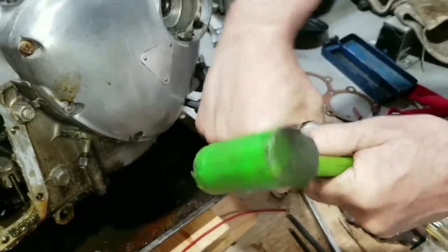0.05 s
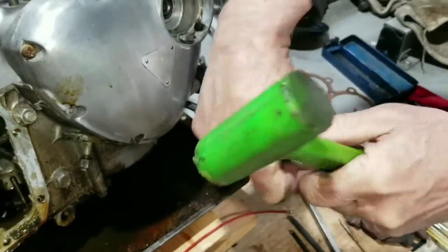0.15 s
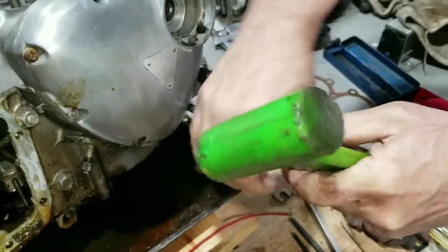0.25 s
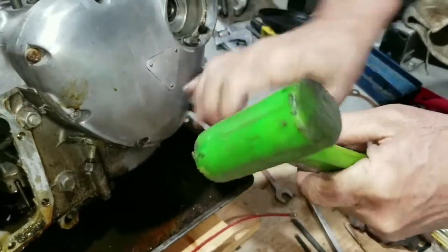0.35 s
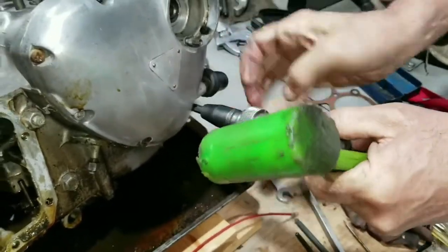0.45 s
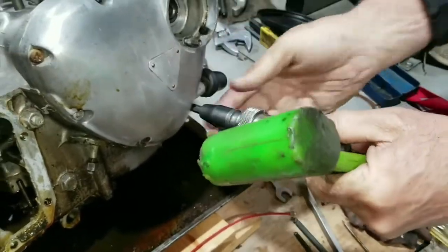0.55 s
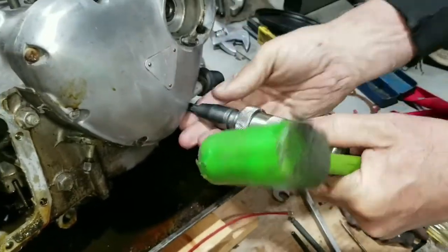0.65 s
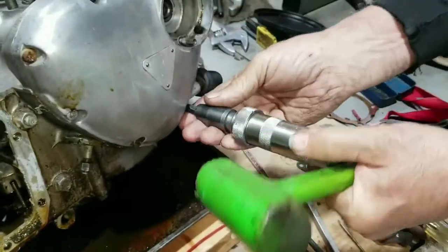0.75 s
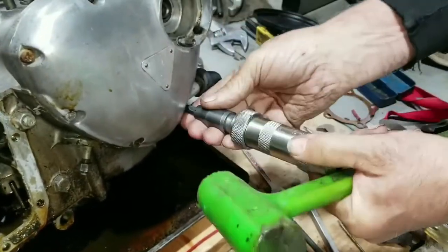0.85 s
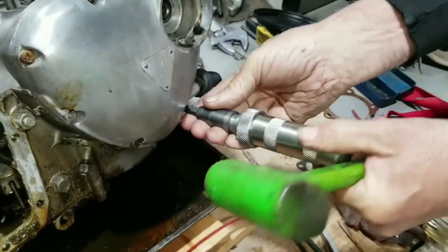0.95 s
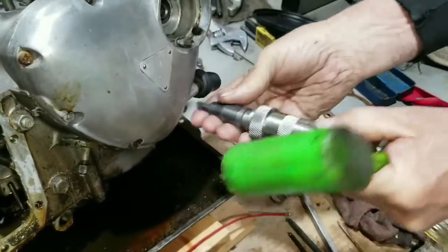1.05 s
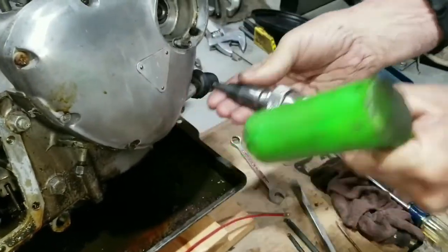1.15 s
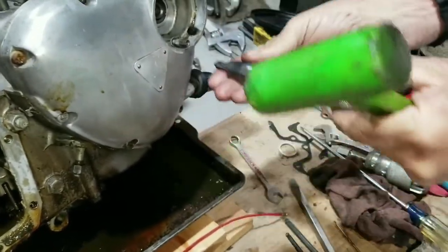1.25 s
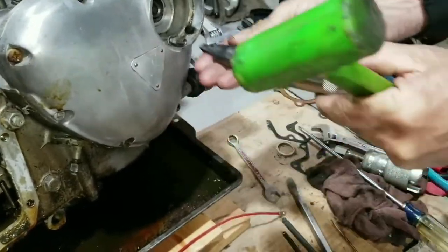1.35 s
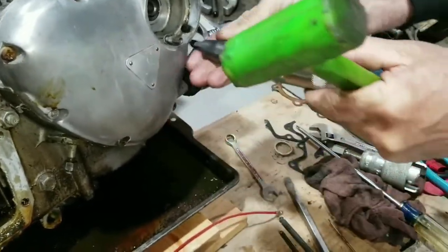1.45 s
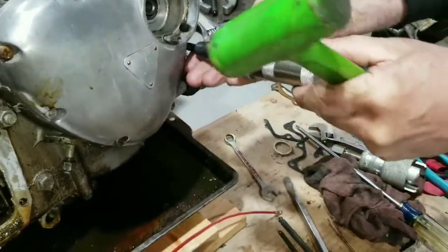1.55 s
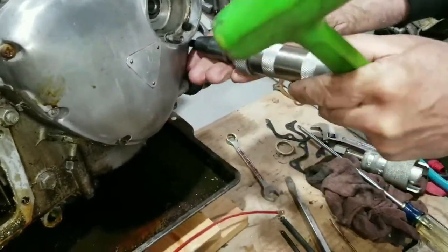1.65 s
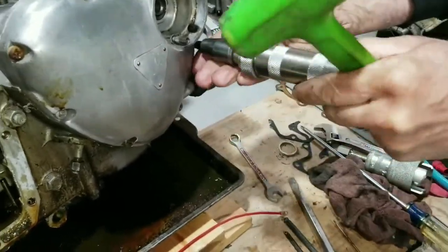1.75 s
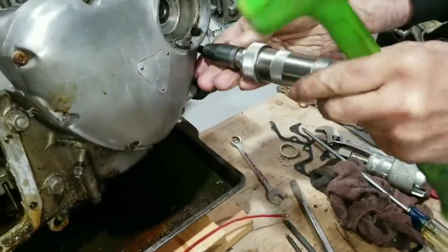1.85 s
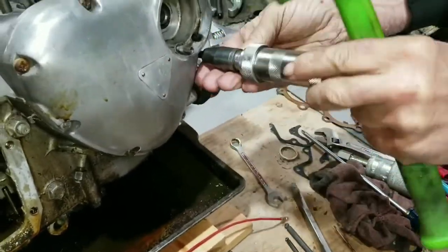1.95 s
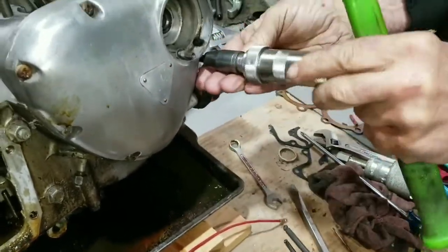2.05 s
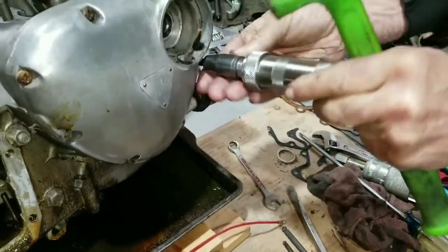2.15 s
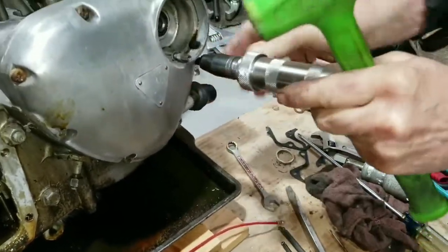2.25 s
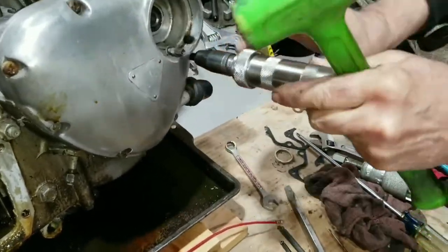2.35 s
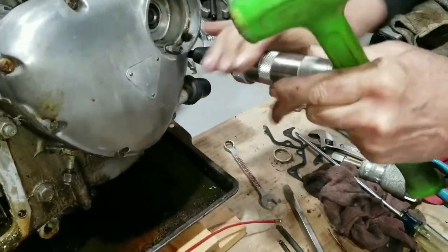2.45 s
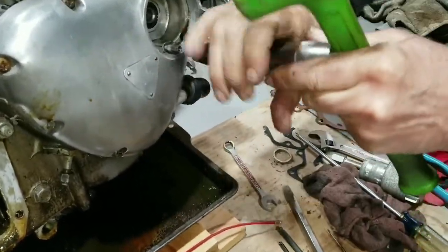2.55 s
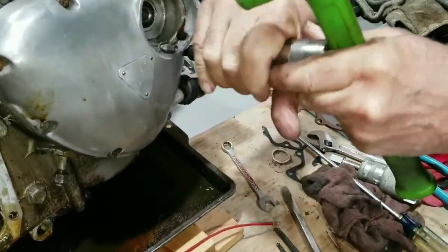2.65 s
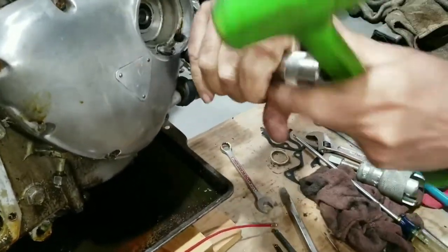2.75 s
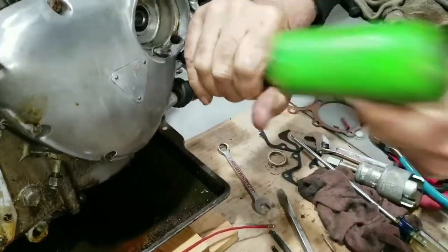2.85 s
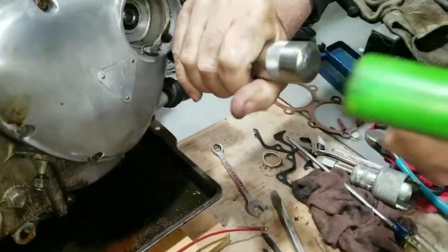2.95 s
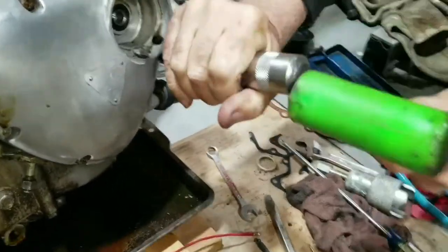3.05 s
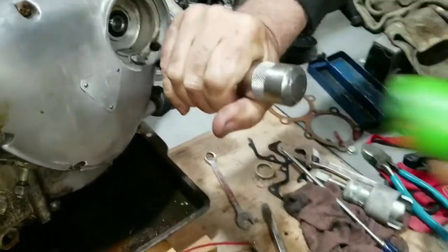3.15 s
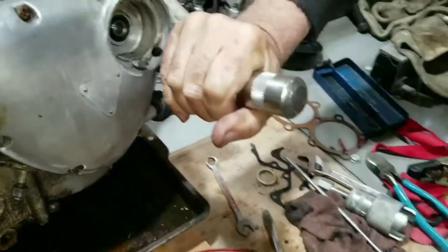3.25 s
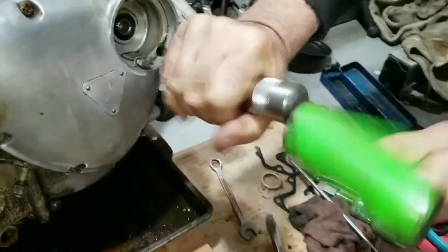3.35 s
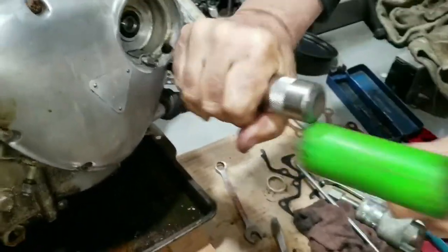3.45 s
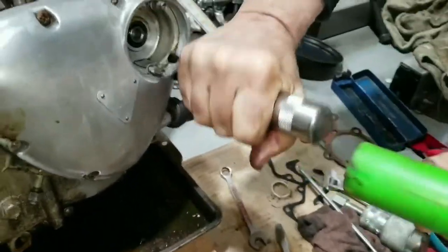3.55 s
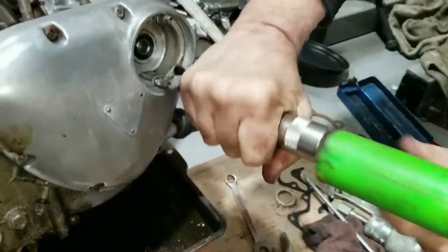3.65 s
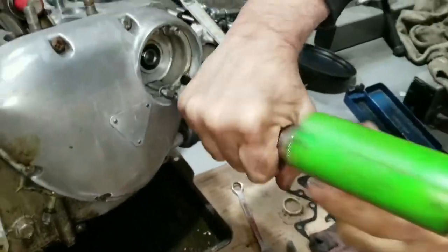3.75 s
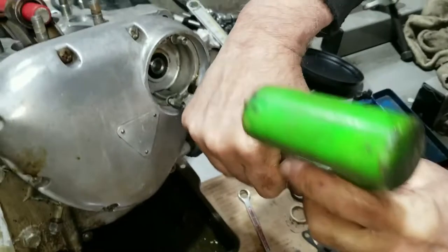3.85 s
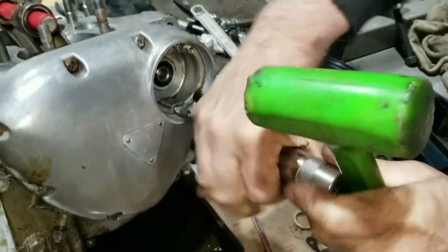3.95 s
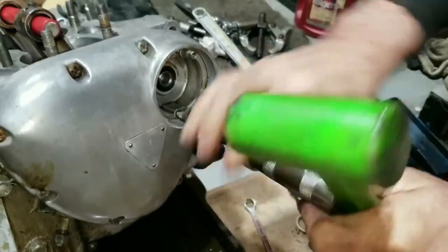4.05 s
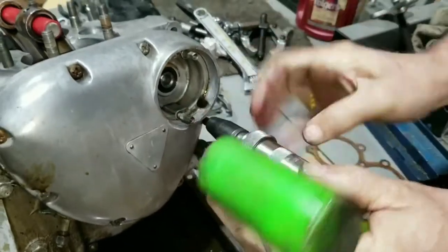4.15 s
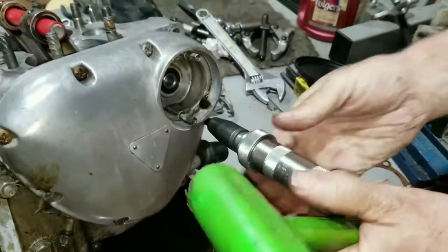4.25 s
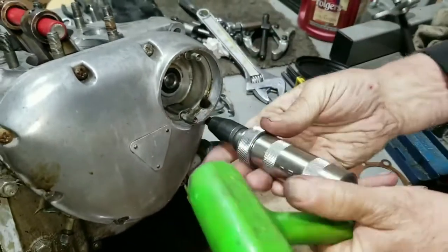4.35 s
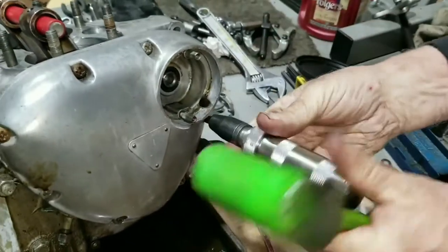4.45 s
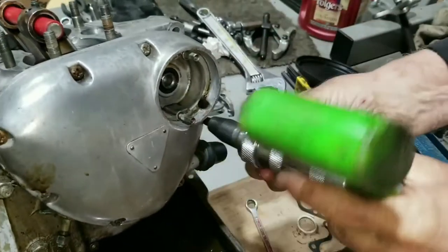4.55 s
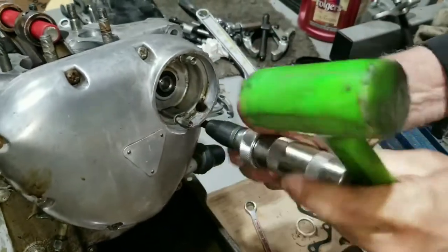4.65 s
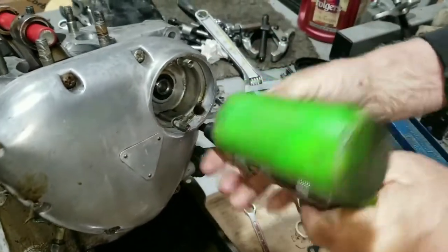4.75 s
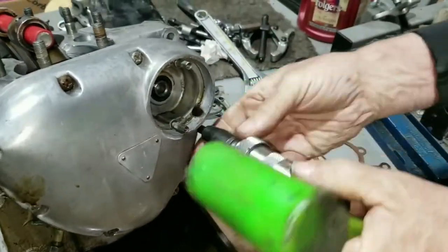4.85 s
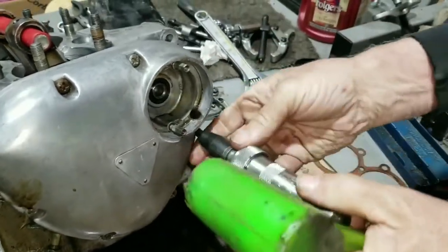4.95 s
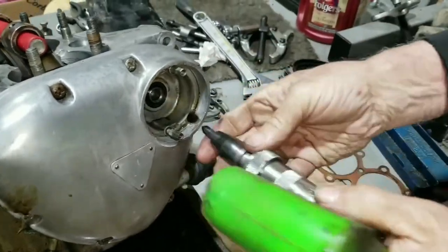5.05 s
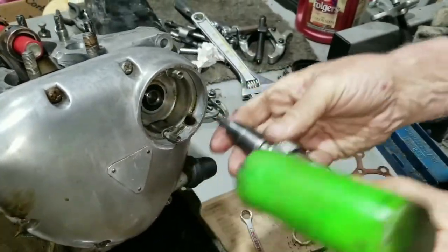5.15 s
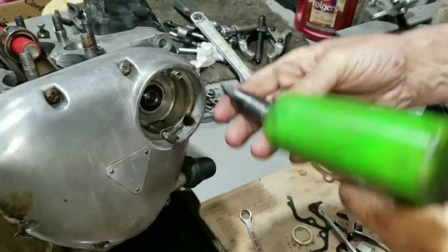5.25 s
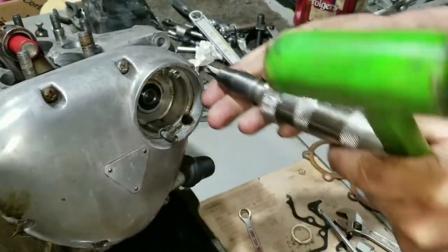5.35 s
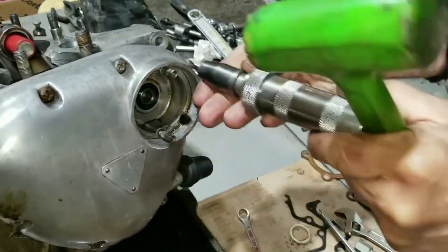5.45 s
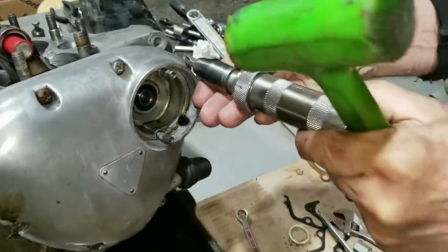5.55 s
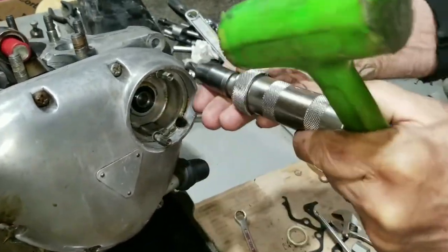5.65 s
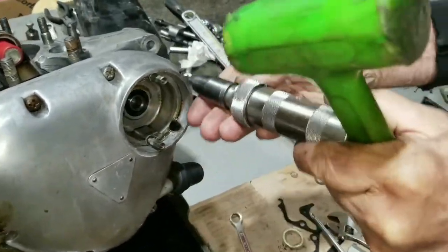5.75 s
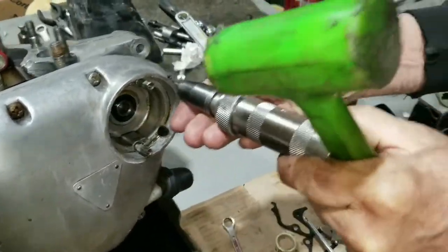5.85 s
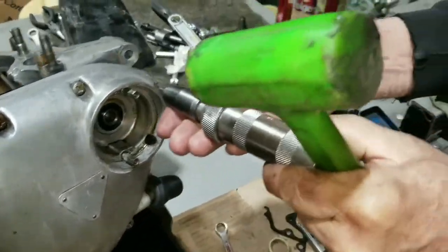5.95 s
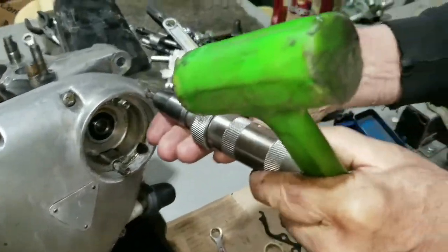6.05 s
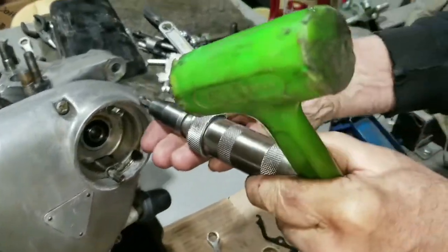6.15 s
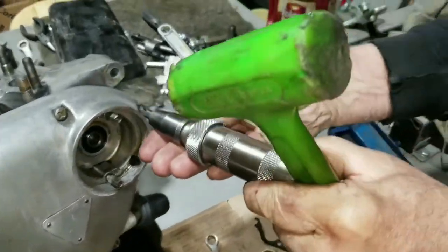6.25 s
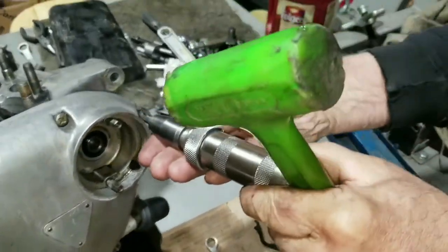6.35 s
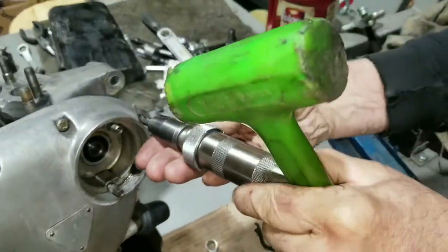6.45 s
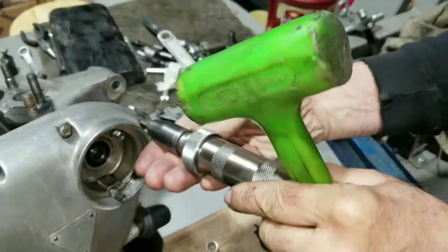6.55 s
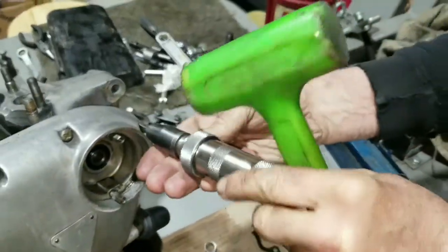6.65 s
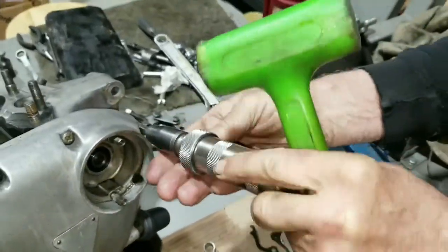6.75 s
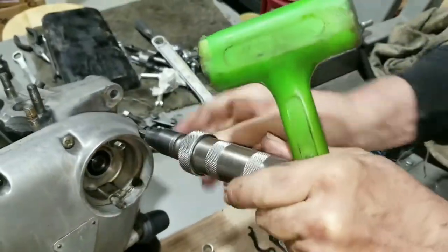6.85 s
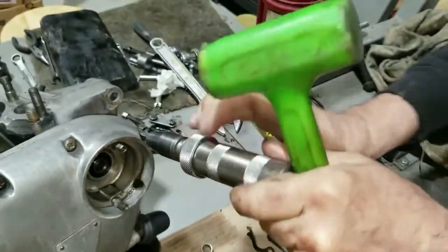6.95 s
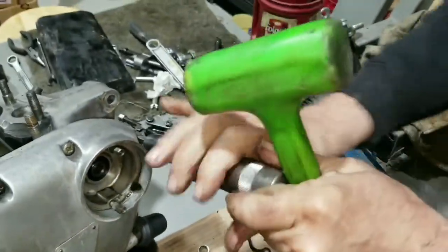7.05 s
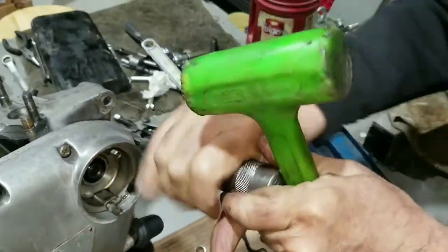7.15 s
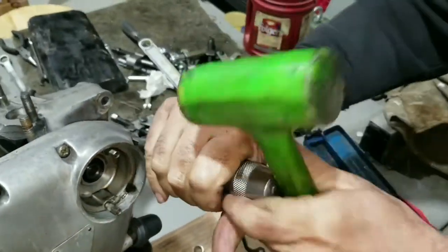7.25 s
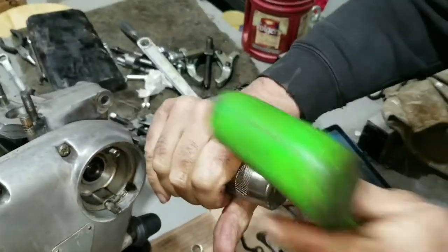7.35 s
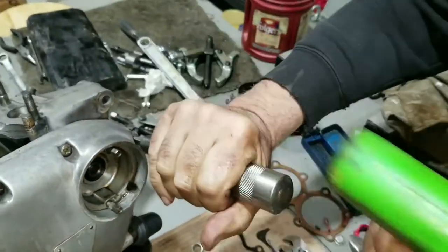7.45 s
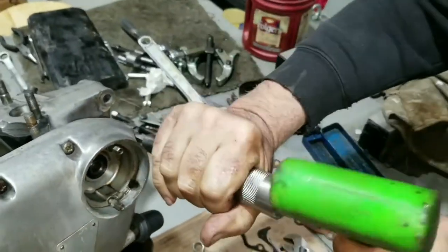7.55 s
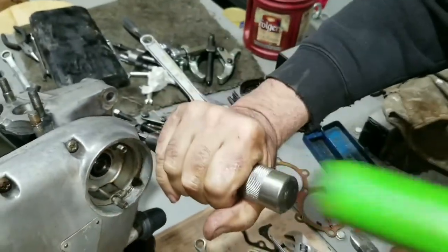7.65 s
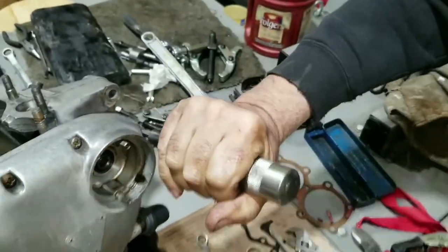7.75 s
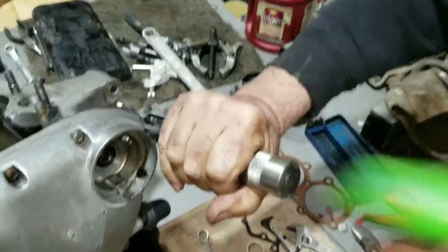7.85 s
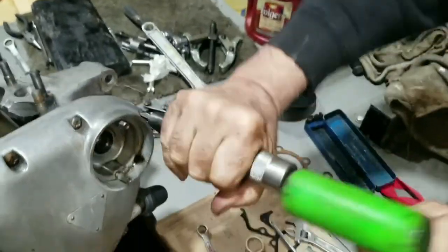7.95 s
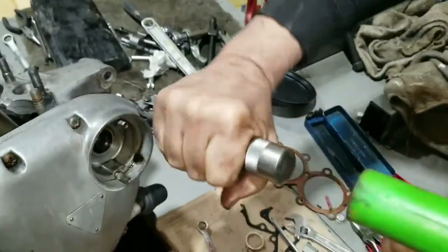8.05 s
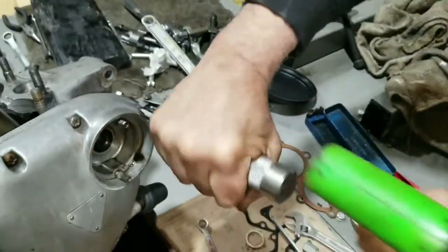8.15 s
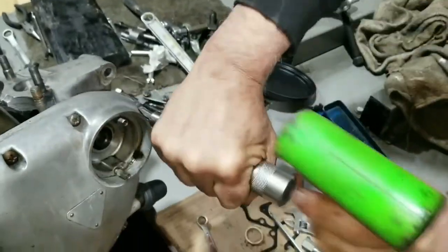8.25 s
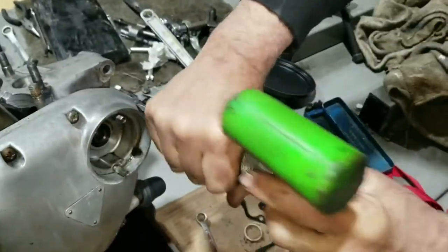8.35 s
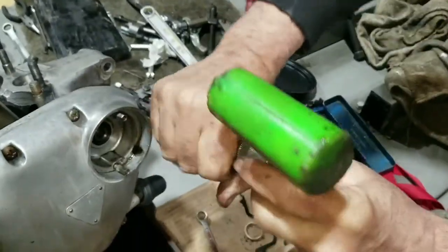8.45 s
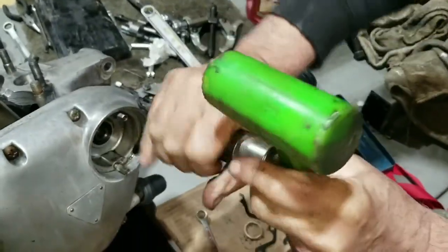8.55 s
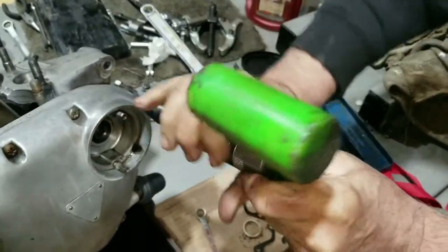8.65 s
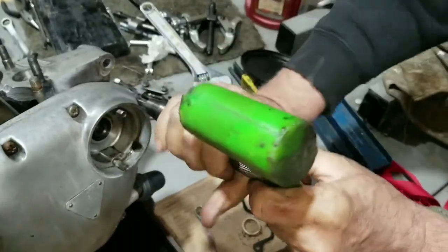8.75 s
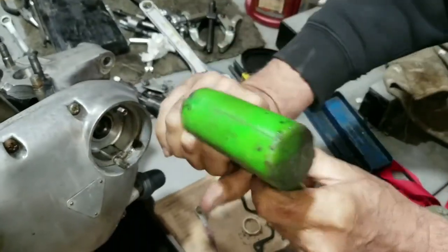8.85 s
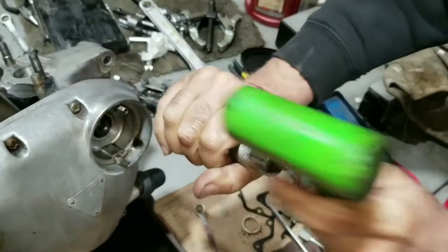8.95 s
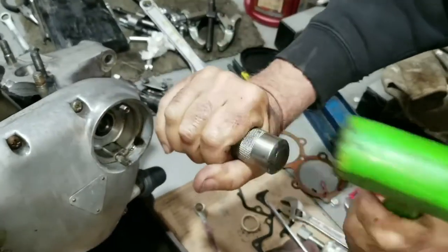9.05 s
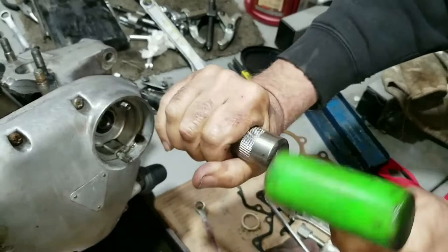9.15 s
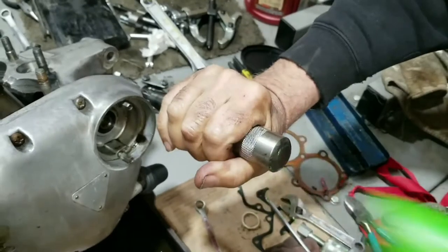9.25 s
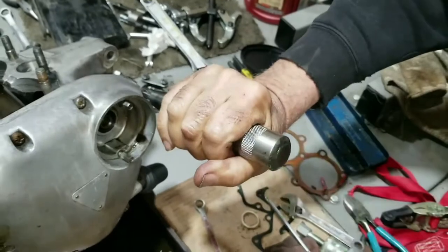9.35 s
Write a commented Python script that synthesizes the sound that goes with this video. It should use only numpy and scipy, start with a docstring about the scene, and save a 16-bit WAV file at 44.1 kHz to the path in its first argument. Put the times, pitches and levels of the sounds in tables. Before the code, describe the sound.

Small tool clicks and light taps surround two sharp, rattling mallet blows on an impact driver in a quiet garage.

```python
"""An impact driver on the screws of an engine's alloy cover, struck with a plastic mallet in a garage.
The bit clicks into a screw head, the mallet handle slides through a palm; a tap, a hard blow (3.3 s):
steel rattles, the cover clangs, the bench thuds, the room answers. The driver is turned and reseated;
another tap, the hardest blow (7.9 s), a last tap (9.1 s).
After each hard blow the gain control holds the faint rumble down for a second."""
import sys
import numpy as np
from scipy import signal
from scipy.fft import rfft, irfft
from scipy.io import wavfile
from scipy.ndimage import uniform_filter1d, minimum_filter1d

SR = 44100
rng = np.random.default_rng(int(sys.argv[2]) if len(sys.argv) > 2 else 0)


def file_out(sig):
    """Save sig as 16-bit WAV at sys.argv[1]."""
    # one column per channel
    cols = np.atleast_2d(sig).T
    # limit, then scale
    lim = np.clip(cols, -1, 1)
    pcm = np.round(lim * 32767).astype(np.int16)
    wavfile.write(sys.argv[1], SR, pcm)


N = 414981
TIME_S = np.arange(N) / SR
AGE_S = np.arange(SR * 2 // 3) / SR  # time since a hit

# mallet blows: t/s, level/dB, tilt/(dB/oct), thud/dB, rebound re blow/dB, rattle t60/s
MALLET_BLOWS = [(2.9961, -30, -0.5, -40, -24, 0.017), (3.3488, -10.5, 0, -23.5, 2.5, 0.1),
                (7.539, -24.5, 2.5, -27, -13, .022), (7.8774, 1, -3, -16.5, 1, 0.17),
                (9.1239, -26.5, 1.5, -35, -31, 0.029)]
# driver kicking back after a blow: delay/s, level/dB, rattle t60 factor
KICKBACKS = [(0.0144, 0, 1.5), (.048, -5, .3)]
# driver bumping the cover: t/s, steel/dB, clang/dB, bench and crankcase/dB, rattle t60/s
DRIVER_BUMPS = [(1.54, -58, -57.5, -46, 0.056), (1.749, -87, -54, -47, 0.093),
                (1.868, -71, -79, -54.5, .25), (1.931, -78, -64, -54, 0.066),
                (2.346, -46.5, -50, -51, 0.11), (2.447, -51.5, -63, -61.5, 0.055),
                (4.012, -57, -59, -53.5, 0.026), (4.652, -60, -68, -59.5, 0.33),
                (5.832, -46, -46, -51, 0.013), (5.871, -49.5, -64, -58, 1), (6.180, -53, -58, -67, 0.24),
                (6.483, -46.5, -47.5, -72, 0.031), (6.624, -61, -56, -53, 0.17),
                (6.824, -42.5, -52, -55, 0.012), (8.624, -45.5, -48, -49.5, 0.11)]
# bit dropping into a screw head: t/s, level/dB, f/Hz
BIT_CLICKS = [(0.9623, -42, 4120), (1.413, -46.5, 4800), (1.628, -55.5, 4900), (1.652, -56.5, 7000),
              (1.7469, -56.5, 5800), (2.0716, -52, 4160), (4.9246, -59.5, 3940), (5.01, -56, 4900),
              (5.027, -47.5, 10800), (5.4382, -50.5, 5330), (5.4525, -49.5, 3800), (5.566, -57, 5200),
              (5.7631, -48, 5800), (5.7779, -46, 6700), (5.978, -48, 5000), (6.0293, -51, 5700),
              (6.4482, -57.5, 5940), (6.4791, -43, 5340), (6.8226, -44.5, 6200), (8.1613, -27, 4200)]
# hand strokes: centre t/s, length/s, level/dB
HANDLE_SLIDES = [(2.708, .08, -52.5), (2.905, 0.13, -33)]
GRIP_SHIFTS = [(.15, 0.58, -79), (1.65, 0.89, -73), (3.315, 0.15, -54), (5.88, 0.63, -66),
               (6.88, .25, -60.5), (7.31, 0.0995, -68.5), (7.83, 0.15, -61), (9.41, 0.07, -65.5)]

# modes: f/Hz, level/dB, left-right/dB
DRIVER_MODES = [(2764, -1, -1.5), (2990, 0, 3.5), (3080, 0.5, -3.5), (3980, -5.5, 1), (4700, -7, 3)]
COVER_MODES = [(940, -9.5, 10), (1194, -6.5, 3.5), (1165, -4, -6), (1173, 0.5, -5), (1466, -2, 3),
               (1523, -3, -5.5), (1770, -6, 2), (2950, -9.5, -4.5), (3040, -17, 1), (3137, -8, -6),
               (4080, -11.5, -2.5)]
CASE_MODES = [(226, -5.5, 0.5), (352, -12, 1), (504, -3, 3.5), (516.6, 3.5, 5.5), (620, -10, 4),
              (734.6, -11.5, -3)]  # hollow crankcase
CASE_LONG_MODES = [(506, 0, 2), (523, -2, 4), (1195, -7, -2), (1395, -7, 0), (2929, -12, 0)]
BENCH_MODES = [(71, -10.5, 3.5), (84.6, -3.5, -1), (120, -0.5, 2.5), (159, -8.5, 3), (215.3, -2.5, 1.5)]

# spectra: f/Hz, level/dB
STEEL_SPECTRUM = [(50, -47.5), (300, -22), (900, -6), (2100, -5.5), (3100, 0.5), (5000, -0.5), (7000, -2),
                  (9000, -4), (11500, -7), (14500, -12)]
COVER_SPECTRUM = [(40, -45.5), (150, -16.5), (400, -4.5), (780, -3.5), (1150, -2), (1550, -2), (2000, -7),
                  (3200, -21.5), (6000, -24.5), (14000, -41)]
BENCH_SPECTRUM = [(20, -46), (40, -29), (65, -13), (100, -5), (140, 4), (200, -4), (300, -2.5),
                  (500, -21.5), (1500, -41.5)]
BIT_SPECTRUM = [(300, -41), (1500, -20), (3000, 16), (5000, 13.5), (8000, 16), (14500, 7.5)]
HANDLE_SPECTRUM = [(180, -20.5), (300, -0.5), (606, -14.5), (763, -9), (943, -5.5), (4390, 1.5),
                   (8600, -4.5), (11500, -6), (14000, -10.5), (15000, -23)]
GRIP_SPECTRUM = [(410, -32.5), (700, -10.5), (893, -10), (1780, -11.5), (2000, -9.5), (4210, -2),
                 (13900, -3), (15000, -17.5)]
TURN_SPECTRUM = [(500, -43), (1300, -3), (2300, -17), (3500, -19.5), (4700, 2), (5600, -3), (6600, 3),
                 (8000, 0), (9300, -13.5), (14500, -12)]
RUMBLE_SPECTRUM = [(15, -40), (25, -15.5), (43, -14), (104, -2.5), (134, 0.5), (310, -10), (345, -7.5),
                   (377, -15.5), (677, -29.5), (900, -28.5), (1170, -62), (1980, -120)]
AIR_SPECTRUM = [(25, -20), (130, -13), (270, -5), (600, -15.5), (2000, -14.5), (6000, -21.5),
                (15000, -31.5)]

# garage decay: f/Hz, t60/s
GARAGE_DECAY = [(80, 0.58), (300, 0.62), (1000, 0.72), (4000, 0.53), (8000, 0.42), (14000, 0.28)]


def blow_contacts(tap_db=-30, case_db_per_db=0.2036):
    """Each blow and its two rebounds; the harder the blow, the larger the crankcase's share."""
    for t_s, db, tilt_db_oct, thud_db, rebound_db, rattle_t60_s in MALLET_BLOWS:
        clang_db = db - 3.5
        case_db = db - 13.5 + case_db_per_db * (db - tap_db)
        rebounds = [(delay_s, rebound_db + kick_db, factor) for delay_s, kick_db, factor in KICKBACKS]
        for delay_s, kick_db, factor in [(0, 0.011, 1)] + rebounds:
            levels_db = np.array([db, clang_db, case_db, thud_db]) + kick_db
            yield t_s + delay_s, levels_db, tilt_db_oct, rattle_t60_s * factor


def strikes(contacts, snap_db, rise_t60_s, case_t60_s):
    """The steel driver snaps and chatters, passing each contact to cover, crankcase and bench."""
    out = np.zeros((2, N))
    for t_s, (steel_db, clang_db, case_db, thud_db), tilt_db_oct, rattle_t60_s in contacts:
        spectrum = [(hz, db + tilt_db_oct * np.log2(hz / 3000)) for hz, db in STEEL_SPECTRUM]
        chatter = flicker(len(AGE_S), depth_db=3, smooth_samples=90)
        rattle = unit_hit(burst(spectrum, rattle_t60_s, shared=0.3, rise_t60_s=rise_t60_s) * chatter)
        snap = amp(snap_db) * burst(spectrum, t60_s=0.0015, shared=0.52)
        thud = amp(thud_db) * bench_thud()
        clang = amp(clang_db) * cover_clang()
        case = amp(case_db) * ring(CASE_MODES, case_t60_s, spread_rad=0.57)
        add(out, t_s, amp(steel_db) * (rattle + snap) + clang + case + thud)
    return out


def cover_clang():
    """Alloy cover: dense clatter plus distinct wall modes."""
    clatter = burst(COVER_SPECTRUM, t60_s=0.15, shared=0.06, rise_t60_s=0.0015)
    return clatter + amp(-7.5) * ring(COVER_MODES, t60_s=0.069, spread_rad=0.47)


def bench_thud():
    """Bench under the engine: dull burst plus low modes."""
    thump = burst(BENCH_SPECTRUM, t60_s=0.14, shared=0.92, rise_t60_s=0.03)
    return thump + amp(-2) * ring(BENCH_MODES, t60_s=0.26, spread_rad=0.71)


def after_ring():
    """Driver and crankcase ring on faintly after each blow."""
    out = np.zeros((2, N))
    for t_s, db, *_ in MALLET_BLOWS:
        driver = amp(-16.5) * ring(DRIVER_MODES, t60_s=0.2, spread_rad=1.4)
        case = amp(-18) * ring(CASE_LONG_MODES, t60_s=0.62, spread_rad=1.2)
        add(out, t_s, amp(db) * (driver + case))
    return out


def bump_contacts(tilt_db_oct=-1.8):
    """The driver bumps the cover; the crankcase's level follows the bench's."""
    for t_s, steel_db, clang_db, thud_db, rattle_t60_s in DRIVER_BUMPS:
        yield t_s, (steel_db, clang_db, thud_db - 1.5, thud_db), tilt_db_oct, rattle_t60_s


def bit_clicks(mid_hz=5200, pan_scatter_db=2, scuff_lead_s=0.0053):
    """The bit scuffs, then drops into a screw head: tick, finger-damped ping, faint clang."""
    out = np.zeros((2, N))
    for t_s, db, ping_hz in BIT_CLICKS:
        ping = unit_hit(np.sin(2 * np.pi * (ping_hz * AGE_S + rng.random((2, 1)))) * decay(0.003))
        tilt_db_oct = 4.5 * np.log2(ping_hz / mid_hz)  # higher ping, brighter tick
        spectrum = [(hz, band_db + tilt_db_oct * np.log2(hz / mid_hz)) for hz, band_db in BIT_SPECTRUM]
        tick = burst(spectrum, t60_s=0.012, shared=0.038, rise_t60_s=0.0055)
        steel = pan(pan_scatter_db * rng.standard_normal()) * (tick + amp(-6) * ping)
        add(out, t_s, amp(db) * (steel + amp(-19) * cover_clang()))
        scuff = burst(BIT_SPECTRUM, t60_s=0.046, shared=0.13, rise_t60_s=0.027)
        add(out, t_s - scuff_lead_s, amp(db - 11) * scuff)
    return out


def hands(rest_db=-76, turn_db=-61.5, turn_start_s=5.36, turn_end_s=7.1, turn_fade_s=0.28):
    """The mallet handle slides through the palm; fingers shift on the knurled driver and turn it."""
    handle = swells(HANDLE_SLIDES) * friction(HANDLE_SPECTRUM, grain_db=1.5)
    grip_gain = amp(rest_db) * drift(depth_db=1) + swells(GRIP_SHIFTS)
    grip = grip_gain * friction(GRIP_SPECTRUM, grain_db=3)
    turn_gate = np.clip(np.minimum(TIME_S - turn_start_s, turn_end_s - TIME_S) / turn_fade_s, 0, 1)
    turn = amp(turn_db) * turn_gate * friction(TURN_SPECTRUM, grain_db=2)
    return handle + grip + turn


def friction(spectrum, grain_db):
    """Countless tiny slips of uneven size."""
    slips = flicker(N, grain_db, smooth_samples=50)
    return unit(colour(noise(N, shared=0.033) * slips, spectrum))


def garage(x, tail_db, early_db, echo_s=0.0051, boom_hz=133, boom_s=0.061, boom_width_s=0.068):
    """Direct sound, bench echo, early reflections, a tail losing its treble first, a late boom."""
    count = len(AGE_S)
    hz, t_s, bands = signal.stft(noise(count, shared=0.037), SR, nperseg=256)
    fade = np.exp(-np.log(1000) * t_s / lookup(GARAGE_DECAY, hz)[:, None])
    tail = signal.istft(bands * fade, SR, nperseg=256)[1][:, :count] * (1 - decay(0.009))
    reflections = noise(count, shared=0) * (rng.random((2, count)) < 1500 / SR)  # 1500 per second
    early = reflections * decay(0.015) * (AGE_S > 0.003)
    diffuse = mono_bass(amp(tail_db) * unit(tail) + amp(early_db) * unit(early)) / np.sqrt(count)
    echo = amp(-10) * np.sinc((AGE_S - echo_s) * SR / 2) / 2
    boom_swell = np.exp(-((AGE_S - boom_s) / boom_width_s) ** 2)  # close standing waves drift into step
    boom = amp(-62) * boom_swell * np.sin(2 * np.pi * boom_hz * AGE_S)
    return x + signal.fftconvolve(x, diffuse + echo + boom, axes=1)[:, :N]


def background(rumble_db=-59.5, air_db=-75):
    """Low rumble that wavers and grows as the hands move, over still air."""
    rumble_gain = amp(rumble_db) * drift(depth_db=-0.42)
    rumble_gain += swells(GRIP_SHIFTS) + amp(-16) * swells(HANDLE_SLIDES)
    rumble = rumble_gain * unit(colour(noise(N, shared=0.88), RUMBLE_SPECTRUM))
    air = amp(air_db) * unit(colour(noise(N, shared=0.27), AIR_SPECTRUM))
    return rumble + air


def gain_control(x, threshold_db=-23, slope=0.64, hold_s=1.125, look_ahead_s=0.005, ceiling_db=-1.5):
    """Ducks just ahead of a loud sound, holds, and rounds off remaining peaks."""
    power_db = 10 * np.log10(abs(uniform_filter1d((x ** 2).mean(0), size=800)) + 1e-12)
    cut_db = slope * np.maximum(power_db - threshold_db, 0)
    hold = round(hold_s * SR)
    held_db = minimum_filter1d(-cut_db, size=hold, origin=(hold - 1) // 2 - round(look_ahead_s * SR))
    gain_db = uniform_filter1d(held_db, size=129)
    return amp(ceiling_db) * np.tanh(x * amp(gain_db - ceiling_db))


def burst(spectrum, t60_s, shared, rise_t60_s=0.0019):
    """Modes too dense to resolve: decaying noise with the body's spectrum."""
    excitation = noise(len(AGE_S), shared) * decay(t60_s) * (1 - decay(rise_t60_s))
    return unit_hit(colour(excitation, spectrum))


def ring(modes, t60_s, spread_rad):
    """Distinct modes, at a different phase in each microphone."""
    phases = rng.uniform(0, 2 * np.pi, (len(modes), 1, 1))
    phases = phases + spread_rad * rng.standard_normal((len(modes), 2, 1))
    tones = sum(amp(db) * pan(pan_db) * np.sin(2 * np.pi * hz * AGE_S + phase)
                for (hz, db, pan_db), phase in zip(modes, phases))
    return unit_hit(tones * decay(t60_s) * (1 - decay(0.016)))


def noise(count, shared):
    """Stereo white noise; shared is the power fraction common to both sides."""
    common, left, right = rng.standard_normal((3, count))
    return np.sqrt(shared) * common + np.sqrt(1 - shared) * np.array([left, right])


def colour(x, spectrum):
    """Minimum-phase filter with the given spectrum."""
    hz = abs(np.fft.fftfreq(4096, 1 / SR))
    log_gain = np.log(amp(np.maximum(lookup(spectrum, hz), -100)))
    taps = np.fft.ifft(np.exp(np.conj(signal.hilbert(log_gain)))).real[:2048]
    return signal.oaconvolve(x, taps[None], axes=1)[:, :x.shape[1]]


def mono_bass(x, corner_hz=230):
    """Long waves reach both microphones alike."""
    alike = 1 / (1 + (np.fft.rfftfreq(x.shape[1], 1 / SR) / corner_hz) ** 4)
    left, right = rfft(x)
    return irfft(np.array([left, alike * left + np.sqrt(1 - alike ** 2) * right]), x.shape[1])


def decay(t60_s):
    """Falls 60 dB in t60_s."""
    return np.exp(-np.log(1000) * AGE_S / t60_s)


def swells(strokes):
    """One bell curve of gain per stroke."""
    return sum(amp(db) * np.exp(-(2 * (TIME_S - t_s) / length_s) ** 2) for t_s, length_s, db in strokes)


def flicker(count, depth_db, smooth_samples):
    """Fast random gain."""
    return amp(depth_db * unit(uniform_filter1d(rng.standard_normal(count), size=smooth_samples)))


def drift(depth_db):
    """Slow random gain."""
    rates_hz = np.geomspace(0.5, 6, 16)
    wander = sum(np.sin(2 * np.pi * (hz * TIME_S + rng.random())) / np.sqrt(hz) for hz in rates_hz)
    return amp(depth_db * unit(wander))


def amp(db):
    """dB to gain."""
    return 10 ** (np.asarray(db) / 20)


def pan(pan_db):
    """Left and right gains."""
    return amp([[pan_db / 2], [-pan_db / 2]])


def unit(x):
    """Scales to rms 1."""
    return x / np.sqrt(np.mean(x ** 2) + 1e-20)


def unit_hit(x):
    """Scales to the energy of 20 ms at rms 1."""
    return x / np.sqrt(np.sum(x ** 2) / (2 * 0.02 * SR))


def lookup(table, hz):
    """Interpolates over log frequency."""
    table_hz, values = np.transpose(table)
    return np.interp(np.log(hz + 1), np.log(table_hz), values)


def add(mix, t_s, sound):
    """Mixes a stereo sound in at t_s."""
    part = mix[:, max(round(t_s * SR), 0):][:, :sound.shape[1]]
    part += sound[:, :part.shape[1]]


def scene():
    """Blows fill the room; small contacts stay slightly drier."""
    hits = strikes(blow_contacts(), snap_db=-14, rise_t60_s=0.011, case_t60_s=0.071)
    blows = garage(hits + after_ring(), tail_db=-9, early_db=-9)
    bumps = strikes(bump_contacts(), snap_db=-17.5, rise_t60_s=0.014, case_t60_s=0.06)
    handling = garage(bumps + bit_clicks() + hands(), tail_db=-9.5, early_db=-11.5)
    return blows + handling + background()


def record(dry, notch_hz=8300, notch_q=2.1, hiss_db=-80.5, cutoff_hz=14800):
    """Treble notch of the right microphone port, gain control, recorder hiss, band limit."""
    right = signal.lfilter(*signal.iirnotch(notch_hz, notch_q, SR), dry[1])
    levelled = gain_control(np.array([dry[0], right]))
    hiss = amp(hiss_db) * unit(colour(noise(N, shared=0), AIR_SPECTRUM))
    low_pass = signal.firwin(255, cutoff_hz, window=("kaiser", 8), fs=SR)
    return signal.oaconvolve(levelled + hiss, low_pass[None], "same", axes=1)


dry = scene()
out = record(dry)
file_out(out)
```